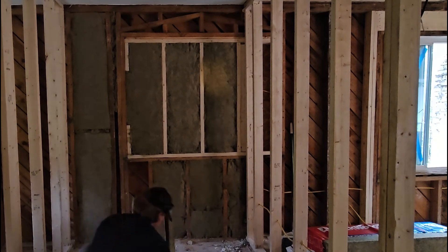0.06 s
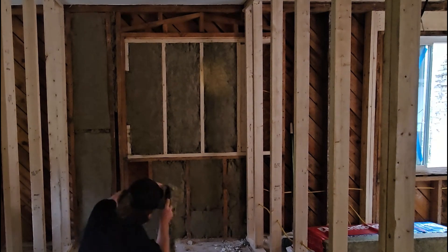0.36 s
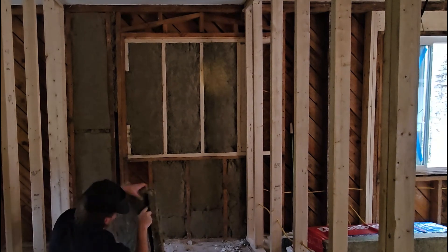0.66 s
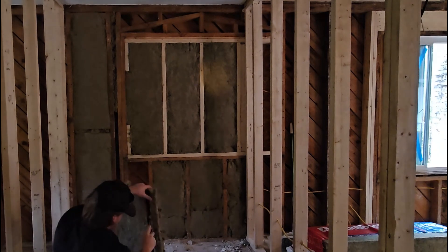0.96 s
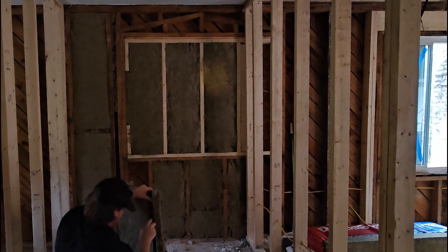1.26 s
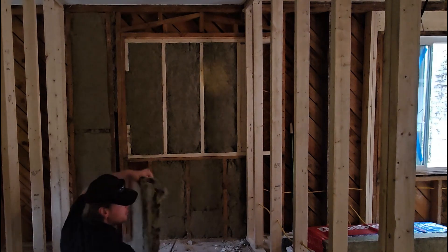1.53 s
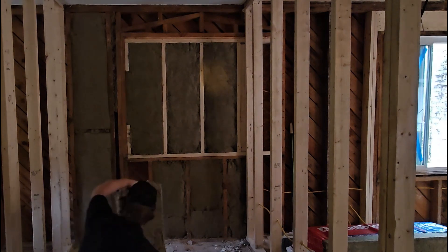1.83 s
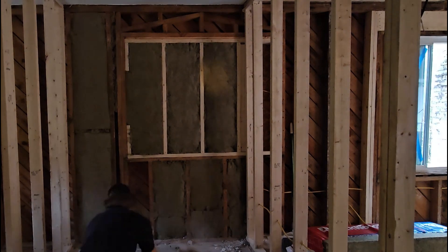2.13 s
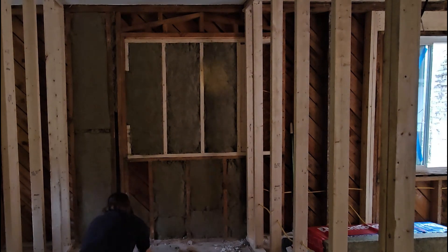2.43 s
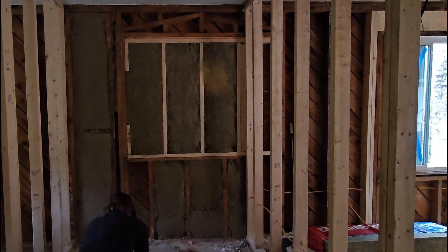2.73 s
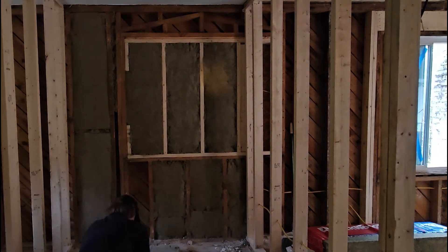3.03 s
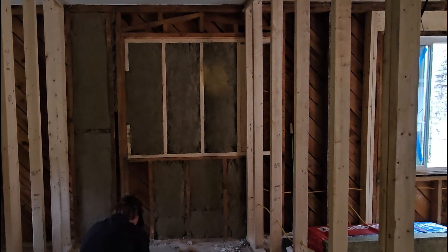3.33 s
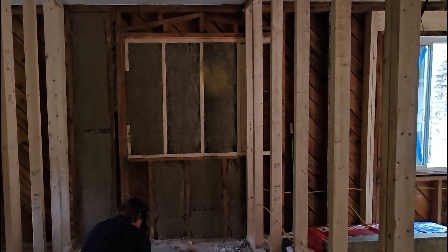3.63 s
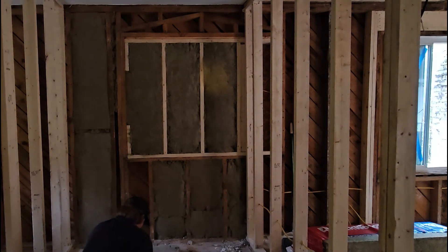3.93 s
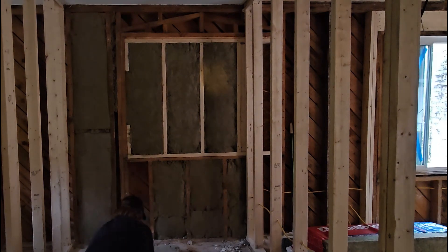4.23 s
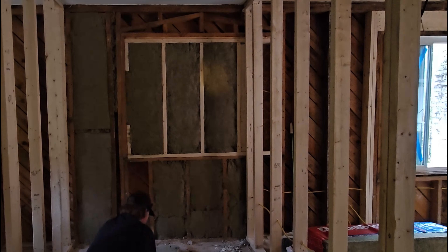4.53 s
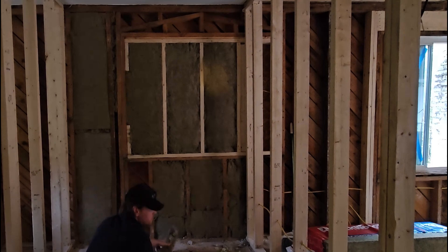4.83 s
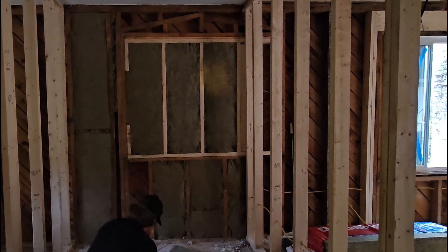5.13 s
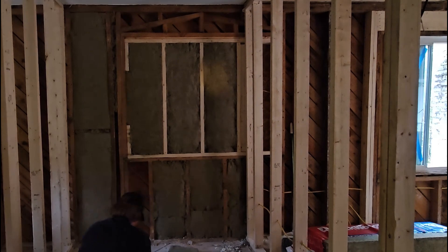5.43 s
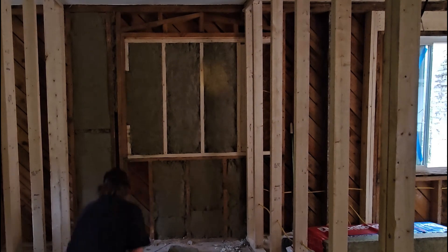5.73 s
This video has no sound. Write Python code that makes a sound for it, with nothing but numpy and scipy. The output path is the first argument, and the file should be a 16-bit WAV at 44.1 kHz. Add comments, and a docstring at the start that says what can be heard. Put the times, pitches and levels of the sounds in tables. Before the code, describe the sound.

A long knife cuts through a slab of mineral wool, heard close up and only on the left, in a quiet room with almost no echo. Each short stroke combines a dull thump with a rasp of brittle fibres, and the wool rubs and rustles in between.

At about 0.3 seconds come a few firm jabs and a dry wooden knock, then a soft drag. Lighter, quick strokes run from 1 to 1.4 seconds, with faint, brief rings from the steel. Scattered strokes and a scratchy drag follow around 2 seconds. The strongest jabs land near 2.5 seconds, starting a busy, uneven run of sawing until 4 seconds, with light knocks on timber and the blade catching near 3.8. The strokes then thin out. Jabs and knocks cluster around 5 seconds, a soft hissing slide follows at 5.6, and one firm stroke lands near 5.7 seconds.

```python
"""In a bare timber-framed room, a long knife saws through a slab of mineral wool in quick, uneven
strokes with short pauses. Each stroke shoves the slab, makes it drum dully and snaps a burst of
brittle fibres; between strokes the wool drags and rustles. The steel blade sings briefly when it
catches, and the wooden frame takes a few knocks. All the sound is in the left channel."""
import sys
import numpy as np
from scipy import signal
from scipy.fft import rfft, irfft, next_fast_len
from scipy.io import wavfile
from scipy.ndimage import map_coordinates

SR = 44100
rng = np.random.default_rng(int(sys.argv[2]) if len(sys.argv) > 2 else 0)


def to_wav(sig):
    """Store sig (one row per channel, or 1-D mono) as 16-bit WAV at the path in sys.argv[1].

    Samples outside -1..1 are clipped; the rate is SR.
    """
    pcm = np.clip(np.atleast_2d(sig), -1, 1) * 32767
    pcm = np.round(pcm).astype(np.int16)
    wavfile.write(sys.argv[1], SR, pcm.T)  # frames by channels


N = 259308

# knife strokes: (time [s], length [s], drum pitch [Hz], shove [dB], drum [dB], tear [dB])
KNIFE_STROKES = [(0.281, 0.025, 220, -20, -23, -39), (0.311, 0.014, 460, -19.5, -16.5, -28),
                 (0.333, 0.018, 248, -26, -33.5, -62), (.582, 0.01, 454, -58, -36.5, -64),
                 (0.979, 0.013, 350, -30, -32, -53), (1.002, 0.026, 383, -36, -40, -57.5),
                 (1.089, 0.036, 353, -35, -40, -57.5), (1.137, 0.029, 284, -26.5, -37.5, -53),
                 (1.2, 0.04, 343, -29, -36, -57), (1.232, .02, 230, -24, -39, -48.5),
                 (1.259, .016, 229, -24.5, -29.5, -50), (1.309, 0.015, 263, -26.5, -32.5, -70.5),
                 (1.38, 0.03, 278, -32.5, -30, -43.5), (1.759, 0.036, 293, -62, -31, -41),
                 (1.842, 0.044, 520, -57, -33.5, -49), (2.043, .026, 335, -40, -32, -43.5),
                 (2.091, 0.027, 262, -14, -26, -38), (2.237, 0.014, 510, -53, -26.5, -43.5),
                 (2.464, 0.015, 400, -20, -11.5, -33.5), (2.503, 0.043, 312, -45, -36, -48),
                 (2.579, .018, 387, -20.5, -14.5, -33.5), (2.672, 0.0096, 330, -38, -39, -52),
                 (2.721, .013, 440, -38, -34, -67), (2.785, 0.023, 391, -32, -18.5, -39.5),
                 (2.883, 0.023, 378, -31, -33.5, -43), (2.931, .014, 292, -39, -36.5, -54.5),
                 (2.976, 0.011, 434, -33.5, -19.5, -36), (3.024, 0.025, 295, -40.5, -36, -83),
                 (3.08, 0.028, 294, -56, -26, -41.5), (3.147, 0.014, 375, -44, -36.5, -57),
                 (3.184, 0.027, 296, -57, -39.5, -51), (3.226, 0.022, 259, -29, -33.5, -56),
                 (3.283, .017, 413, -14.5, -17, -38.5), (3.324, 0.012, 215, -23.5, -31, -52),
                 (3.374, 0.016, 258, -26, -31, -36), (3.417, 0.013, 304, -34, -33.5, -58),
                 (3.469, 0.015, 403, -43, -36.5, -49.5), (3.518, 0.019, 295, -33.5, -36, -54.5),
                 (3.569, 0.036, 264, -25.5, -32, -46.5), (3.673, .02, 272, -29, -20, -41.5),
                 (3.746, 0.03, 318, -16, -18.5, -32), (3.82, 0.033, 279, -38, -35, -35),
                 (3.852, 0.037, 240, -27, -29, -61), (3.926, 0.021, 300, -46, -31, -61),
                 (4.027, 0.015, 290, -37.5, -30, -52.5), (4.395, 0.037, 350, -21, -31.5, -45.5),
                 (4.554, 0.021, 290, -19, -21, -46), (4.667, 0.034, 272, -36.5, -42, -55.5),
                 (4.864, 0.022, 362, -35.5, -47.5, -48), (4.972, 0.025, 544, -17.5, -23, -52),
                 (5.043, 0.027, 400, -31.5, -20, -32.5), (5.339, 0.02, 230, -27.5, -52, -65.5),
                 (5.478, 0.02, 228, -45, -28.5, -46.5), (5.672, 0.02, 430, -31.5, -32, -46.5),
                 (5.736, 0.013, 458, -20.5, -14, -35)]
# tone of coarse fibres tearing: (frequency [Hz], level [dB])
RASP_TONE = [(400, -54.5), (800, 2.5), (950, 1), (1130, -0.5), (1300, 0), (1600, -1.5), (2050, -4),
             (2900, -5.5), (3900, -12.5), (4800, -17.5), (8000, -120)]
# tone of fine fibres breaking: (frequency [Hz], level [dB])
FIZZ_TONE = [(1500, -120), (3200, -4.5), (4100, -3), (7200, 0), (10000, -4), (13500, -2.5), (16000, -8)]
# how much the fine fizz is turned up or down: (time [s], level [dB])
FIZZ_BOOST = [(.4, 0), (.9, 4.5), (1.4, 5), (1.7, -3), (2.55, 4), (2.8, -2.5), (3.2, 2.5), (4.95, -1),
              (5.7, 0.5)]


def knife_strokes():
    """Every stroke shoves the slab, drums on it and tears a bunch of fibres."""
    out = np.zeros(N)
    t = np.arange(SR // 4) / SR - 0.1
    for when, length, pitch, shove_db, drum_db, tear_db in KNIFE_STROKES:
        rise = rise_time(length)
        fall = length - rise
        thud = shove(t, when, rise, fall, shove_db)
        body = drum(t, swell(t, rise, fall, taper=1.5), pitch, drum_db)
        rip = tear(t, when, rise, fall, tear_db)
        add(out, when + t[0], thud + body + rip)
    return out


def rise_time(length):
    """Seconds a stroke takes to reach full pressure; short strokes bite at once."""
    return np.clip(0.6 * length - 0.003, 0.1 * length, 0.9 * length)


def shove(t, when, rise, fall, db):
    """A thud, low while the whole slab swings and higher while it is pinned down."""
    # pitch of the thud through the scene: (time [s], pitch [Hz])
    thud_pitches = [(.3, 168), (1.0, 75.5), (2.1, 93.6), (2.6, 115), (3.2, 126.7), (3.75, 154.5),
                    (4.39, 108), (4.56, 133), (4.97, 149), (5.04, 71.3), (5.34, 68), (5.7, 150)]
    pitch = np.interp(when, *np.transpose(thud_pitches))
    heave = filtered(rng.standard_normal(len(t)), lambda hz: resonance(hz, pitch, q=1.86) ** 2)
    return amp(db - 2.5) * burst(heave, swell(t - 0.001, 0.72 * rise, 1.13 * fall, taper=1.43))


def drum(t, shape, pitch, db):
    """The soft slab shudders dully, brighter when it is pressed tighter."""
    # tone of the slab at a pitch of 380 Hz: (frequency [Hz], level [dB])
    slab_tone = [(100, -65), (170, 0.5), (260, -0.5), (480, -2.5), (660, -3.5), (800, -13.5), (1000, -18),
                 (1600, -75), (3000, -120)]

    def slab(hz):
        shifted_tone = amp(along(slab_tone, hz * np.sqrt(380 / pitch)))
        return shifted_tone * (0.37 + resonance(hz, pitch, q=2.83))

    shudder = burst(filtered(rng.standard_normal(len(t)), slab), shape)
    # a hard stroke near the slab's own pitch sticks and slips evenly, giving a brief clear note
    note_share = np.clip((db + 36.5) / 18, 0, 0.66) * abs(resonance(pitch, 398, q=4.1)) ** 2
    note = burst(np.sin(2 * np.pi * pitch * t + 0.56 * wobble(150.64, len(t))), shape)
    mix = np.sqrt(note_share) * note + np.sqrt(1 - note_share) * shudder
    return amp(db) * unit(mix) * np.sqrt(np.mean(shape ** 2))


def tear(t, when, rise, fall, db):
    """Fibres break in clumps while the blade moves: coarse ones rasp, fine ones fizz."""
    size = len(t)
    shape = swell(t - 0.002, rise + 0.0021, fall, taper=1.26)
    coarse = rippled(coloured(fibres(size, spread_db=5.5), RASP_TONE), depth_db=5, spacing_hz=149.2)
    fine = rippled(coloured(fibres(size, spread_db=2), FIZZ_TONE), depth_db=1.5, spacing_hz=426)
    rasp = burst(through_blade(coarse), shape * amp(2.3 * wobble(309, size)))
    fizz = burst(through_blade(fine), shape * amp(2.4 * wobble(280, size)))
    # fine fibres break at the lightest touch, so the fizz grows more slowly than the rasp
    fizz_db = -50.5 + 0.78 * (db + 42.5) + np.interp(when, *np.transpose(FIZZ_BOOST))
    return amp(db - 2.5) * rasp + amp(fizz_db) * fizz


def fibres(size, spread_db):
    """Countless tiny breaks, most weak and a few strong."""
    return rng.standard_normal(size) * amp(spread_db * rng.standard_normal(size))


def rippled(x, depth_db, spacing_hz):
    """Nearby surfaces give each point of contact its own peaks and dips in tone."""
    bumps = rng.standard_normal(SR // 40)
    return filtered(x, lambda hz: amp(depth_db * map_coordinates(bumps, [hz / spacing_hz], mode="mirror")))


def through_blade(x):
    """The knife bends and adds its own thin ring to every scrape."""
    # notes of the steel: (pitch [Hz], strength [ratio])
    steel = [(2340, 1.8), (2930, 0.8), (3350, 0.33), (4495, 0.52)]
    ringing = filtered(x, lambda hz: 1 + sum(gain * resonance(hz, pitch, q=120) for pitch, gain in steel))
    return unit(ringing)


def wool_drag():
    """Wool slides on blade and hands: a lumpy rub with a fine glassy rustle."""
    rubbing, rustling = sliding_strength()
    boost_db = np.interp(np.arange(N) / SR, *np.transpose(FIZZ_BOOST))
    grip_db = 4.5 * wobble(35, N) + 2.09 * wobble(420, N)  # the grip sticks and slips
    # tone of the low rub: (frequency [Hz], level [dB])
    rub_tone = [(15, -48.5), (40, -5.5), (70, -7.5), (130, -1.5), (220, -10), (450, -11.5), (700, -17.5),
                (1000, -25), (2000, -82), (5000, -120)]
    rub = rubbing * amp(grip_db - 4) * coloured(rng.standard_normal(N), rub_tone)
    coarse = through_blade(coloured(fibres(N, spread_db=5), RASP_TONE))
    fine = through_blade(coloured(fibres(N, spread_db=4), FIZZ_TONE))
    rustle = rustling * (amp(grip_db - 7) * coarse + amp(grip_db + boost_db - 6.5) * fine)
    return blade_turns() * (rub + rustle)


def sliding_strength():
    """Light contact, slow drags and the slip around each stroke add up to rub and rustle."""
    # how firmly blade and hands rest on the wool: (time [s], level [dB])
    contact_levels = [(0.0, -70.5), (0.13, -73), (1.24, -61), (1.46, -66.5), (1.69, -63), (1.91, -55.5),
                      (2.08, -56), (2.26, -76), (2.5, -71), (2.65, -55.5), (3.73, -63.5), (3.88, -66),
                      (4.03, -67.5), (4.93, -58.5), (5.17, -75), (5.44, -64), (5.63, -47.5), (5.88, -66.5)]
    # slow drags through the wool: (time [s], half length [s], rub [dB], rustle [dB])
    drags = [(0.569, 0.079, -42.5, -55.5), (0.725, 0.037, -53.5, -70), (0.792, 0.097, -49, -64),
             (0.896, 0.015, -37, -56.5), (1.326, 0.016, -29.5, -44.5), (1.733, 0.031, -46.5, -52.5),
             (2.138, 0.051, -46, -45), (2.202, .04, -30.5, -39.5), (2.611, 0.054, -34, -49.5),
             (2.831, 0.014, -33.5, -50.5), (3.015, .025, -49, -65.5), (3.125, 0.021, -31.5, -50.5),
             (3.623, 0.027, -39.5, -55.5), (4.276, 0.039, -44, -49), (4.39, 0.035, -33.5, -45.5),
             (5.059, .018, -26.5, -39.5), (5.113, .03, -50, -61), (5.216, 0.026, -45.5, -58),
             (5.55, 0.058, -45, -46.5), (5.643, 0.033, -32.5, -74), (5.745, 0.069, -59, -50.5)]
    contact_db = np.interp(np.arange(N) / SR, *np.transpose(contact_levels))
    rub_power, rustle_power = amp(contact_db + 11) ** 2, amp(contact_db - 1) ** 2
    t = np.arange(SR // 2) / SR - 0.2
    slides = [(when, swell(t, half, half, taper=1.66), *levels) for when, half, *levels in drags]
    for when, length, _, _, drum_db, tear_db in KNIFE_STROKES:
        slip = swell(t, rise_time(length), fall=0.025, taper=1.2)
        slides.append((when, slip, drum_db - 12, tear_db - 13))
    for when, shape, rub_db, rustle_db in slides:
        add(rub_power, when + t[0], (amp(rub_db) * shape) ** 2)
        add(rustle_power, when + t[0], (amp(rustle_db) * shape) ** 2)
    return np.sqrt(rub_power), np.sqrt(rustle_power)


def blade_turns():
    """The sliding gets quieter as the blade stops and turns just before each stroke."""
    lead_s, half_s, dip_db = 0.029, 0.0072, -5
    t = np.arange(N) / SR
    still = sum(np.exp(-((t - when + lead_s) / half_s) ** 2) for when, *_ in KNIFE_STROKES)
    return amp(dip_db * np.minimum(still, 1))


def blade_catches():
    """The steel catches and sings for a moment."""
    # catches: (time [s], half length [s], pitch [Hz], level [dB])
    catches = [(1.006, 0.0085, 2370, -59.5), (1.095, 0.017, 4490, -67), (1.145, 0.007, 4500, -64),
               (1.26, 0.007, 4470, -58), (1.315, .015, 4440, -66), (1.376, 0.0057, 4430, -39.5),
               (2.2, 0.018, 1920, -46), (2.502, 0.0095, 2880, -45.5), (3.812, 0.0089, 3120, -40),
               (3.829, 0.0081, 4520, -37)]
    return friction(catches, q=11)


def swishes():
    """Smooth slides over the face of the slab make a soft hiss."""
    # slides: (time [s], half length [s], pitch [Hz], level [dB])
    slides = [(.567, 0.0143, 1270, -48.5), (2.625, 0.033, 2400, -56), (4.9, 0.041, 12500, -57),
              (5.585, 0.026, 6870, -45.5), (5.595, 0.013, 12740, -44)]
    return friction(slides, q=2.3)


def friction(rows, q):
    """Short swells of rubbing noise around one pitch each: high q sings, low q hisses."""
    out = np.zeros(N)
    t = np.arange(SR // 5) / SR - 0.1
    for when, half, pitch, db in rows:
        ring = filtered(rng.standard_normal(len(t)), lambda hz: resonance(hz, pitch, q) ** 2)
        add(out, when + t[0], amp(db + 0.5) * burst(ring, swell(t, half, half, taper=3.8)))
    return out


def frame_knocks():
    """The wooden frame rings short and dry, with a new mix of its notes at each blow."""
    # knocks: (time [s], level [dB])
    blows = [(0.313, -29.5), (2.46, -33.5), (2.974, -38.5), (3.08, -39), (3.28, -38.5), (3.73, -33),
             (4.966, -40), (5.026, -32), (5.037, -28), (5.059, -35)]
    # notes of the wood: (pitch [Hz], level [dB], time to fade by 60 dB [s])
    wood_notes = [(1330, 19, 0.031), (1506, 17.5, 0.057), (1728, 9.5, 0.071)]
    out, t = np.zeros(N), np.arange(SR // 6) / SR
    attack = 1 - np.exp(-t / 0.00042)
    for when, db in blows:
        ring = np.zeros(len(t))
        for pitch, note_db, fade_s in wood_notes:
            fade = amp(note_db + rng.normal(0, 1) - 60 * t / fade_s)
            ring += fade * np.sin(2 * np.pi * pitch * t + 1.2 * wobble(378, len(t)))
        add(out, when, amp(db - 13.5) * unit(ring * attack))
    return out


def fibre_snaps():
    """A single coarse fibre breaks with a bright tick."""
    # snaps: (time [s], level [dB])
    snaps = [(0.316, -55.5), (2.088, -42.5), (2.199, -46)]
    tick_tone = [(500, -38), (2000, -5), (7000, -16), (16000, -19.5)]  # (frequency [Hz], level [dB])
    out, t = np.zeros(N), np.arange(SR // 40) / SR
    fade = amp(-60 * t / 0.016)
    for when, db in snaps:
        add(out, when, amp(db + 12.5) * fade * coloured(rng.standard_normal(len(t)), tick_tone))
    return out


def room_echo(x):
    """The short echo of a room lined with wool."""
    # how long the echo lasts: (frequency [Hz], time to fade by 60 dB [s])
    fade_times = [(80, 0.23), (400, 0.073), (2000, 0.15), (12000, 0.1)]
    hz, t, noise = signal.stft(rng.standard_normal(SR // 2), SR, nperseg=256)
    fade = amp(-60 * t / along(fade_times, hz)[:, None])
    tail = signal.istft(noise * fade, SR, nperseg=256)[1]
    return signal.fftconvolve(x, tail / np.linalg.norm(tail))[:N]


def building_rumble():
    """The steady low noise of a quiet building."""
    # tone of the rumble: (frequency [Hz], level [dB])
    rumble_tone = [(15, -25.5), (70, 13), (140, 3), (300, -28.5), (700, -23.5), (1500, -37), (5000, -30.5),
                   (16000, -44)]
    return coloured(rng.standard_normal(N), rumble_tone)


def amp(db):
    """Turn decibels into a number to multiply by."""
    return 10 ** (np.asarray(db) / 20)


def unit(x):
    """Scale a sound to an average power of 1."""
    return x / np.sqrt(np.mean(x ** 2) + 1e-20)


def along(points, hz):
    """Read between (frequency [Hz], value) points, with octaves evenly spaced."""
    frequencies, values = np.transpose(points)
    return np.interp(np.log(hz + 1), np.log(frequencies), values)


def filtered(x, response):
    """Turn each frequency of x up or down by response(hz)."""
    size = next_fast_len(len(x) + 4096)
    return irfft(rfft(x, size) * response(np.fft.rfftfreq(size, 1 / SR)), size)[:len(x)]


def coloured(x, tone):
    """Shape x by (frequency [Hz], level [dB]) points, at an average power of 1."""
    return unit(filtered(x, lambda hz: amp(along(tone, hz))))


def resonance(hz, centre_hz, q):
    """How a ringing thing answers each frequency; higher q gives a narrower peak."""
    return 1j * hz * centre_hz / q / (centre_hz ** 2 - hz ** 2 + 1j * hz * centre_hz / q)


def wobble(rate, size):
    """A smooth curve through `rate` random values a second."""
    values = rng.standard_normal(size // 20 + 4)
    return map_coordinates(values, [np.arange(size) * rate / SR], mode="mirror")


def swell(t, rise, fall, taper):
    """Pressure builds up to t = 0, then lets go: taper 1 trails off, above 2 it stops short."""
    return np.exp(-np.abs(np.minimum(t, 0) / rise) ** 2.28 - np.abs(np.maximum(t, 0) / fall) ** taper)


def burst(x, shape):
    """Make x follow a loudness shape and carry that shape's energy."""
    return unit(x * shape) * np.sqrt(np.mean(shape ** 2))


def add(track, when, sound):
    """Mix a sound into the track at a time in seconds."""
    part = track[max(round(when * SR), 0):][:len(sound)]
    part += sound[:len(part)]


def scene():
    """Close cutting over a quiet building, on the left channel alone."""
    work = knife_strokes() + wool_drag() + blade_catches() + swishes() + frame_knocks() + fibre_snaps()
    left = work + amp(-34) * room_echo(work) + amp(-61) * building_rumble()
    return np.array([2 * left, np.zeros(N)])


def record(dry):
    """The loudest peaks are rounded off and the highest treble is cut."""
    top_hz = 15850
    rounded = dry / (1 + np.abs(dry) ** 6) ** (1 / 6)
    return np.array([filtered(channel, lambda hz: hz < top_hz) for channel in rounded])


dry = scene()
out = record(dry)
to_wav(out)
```